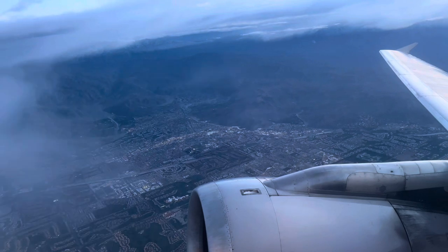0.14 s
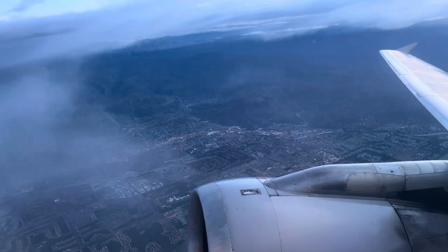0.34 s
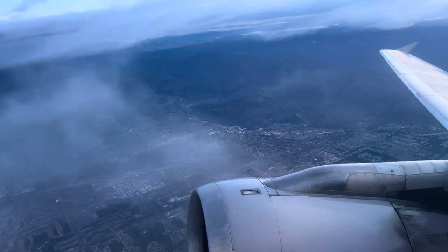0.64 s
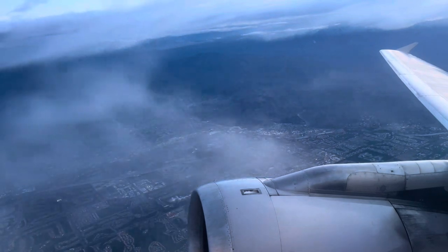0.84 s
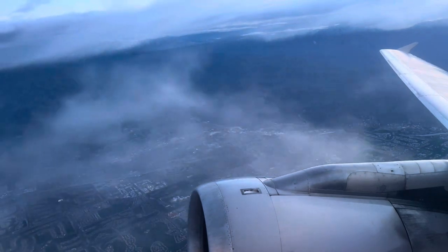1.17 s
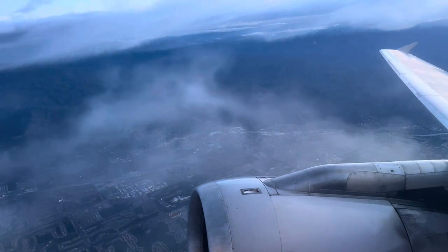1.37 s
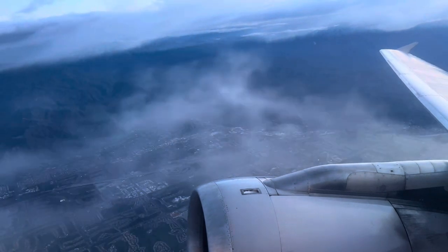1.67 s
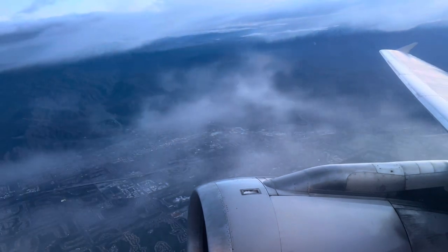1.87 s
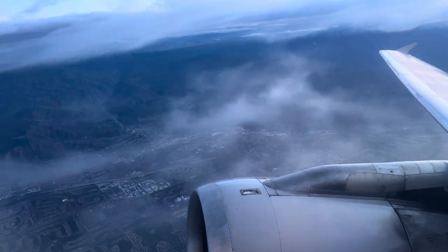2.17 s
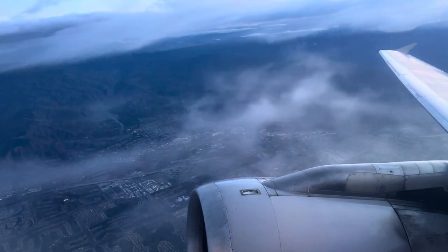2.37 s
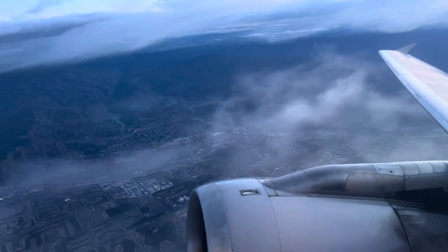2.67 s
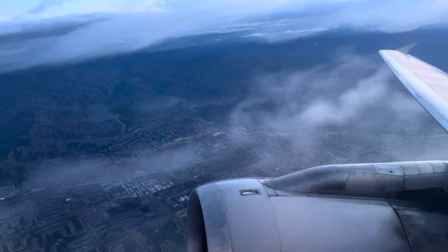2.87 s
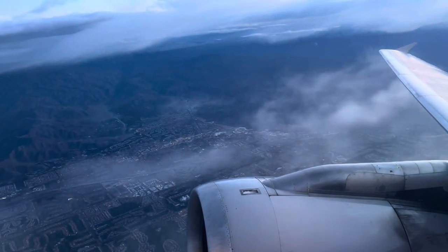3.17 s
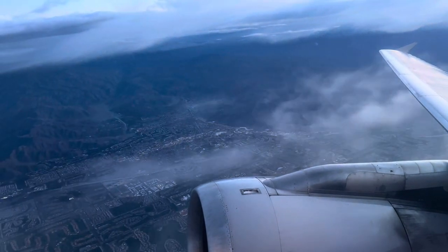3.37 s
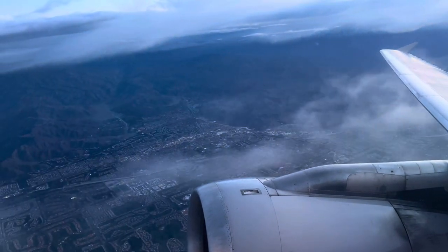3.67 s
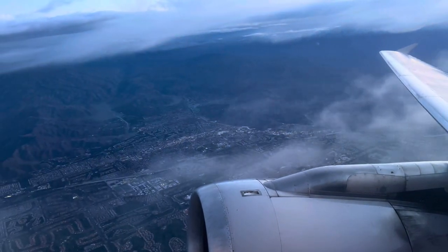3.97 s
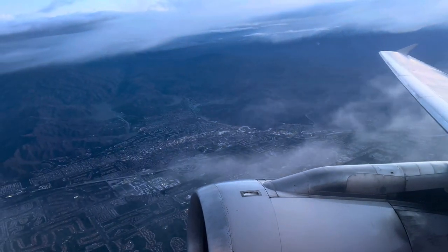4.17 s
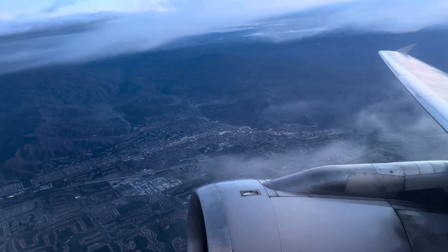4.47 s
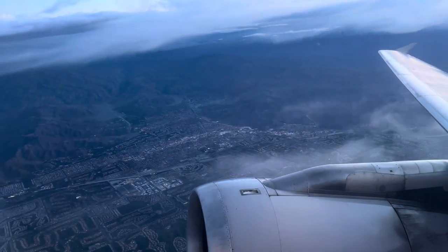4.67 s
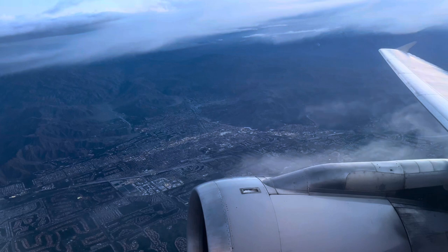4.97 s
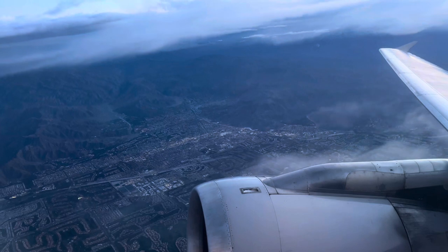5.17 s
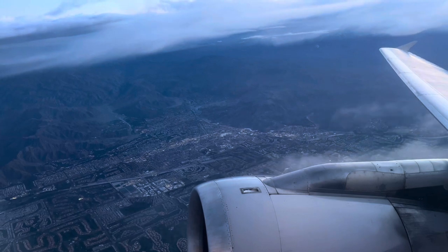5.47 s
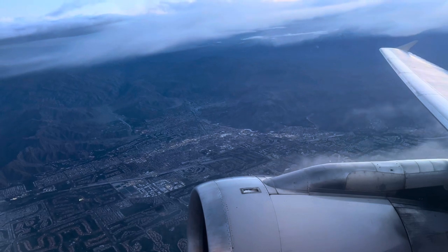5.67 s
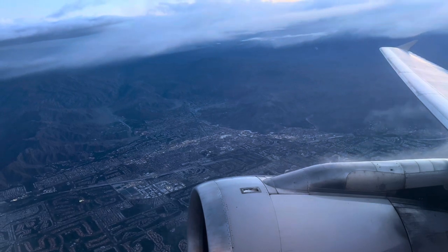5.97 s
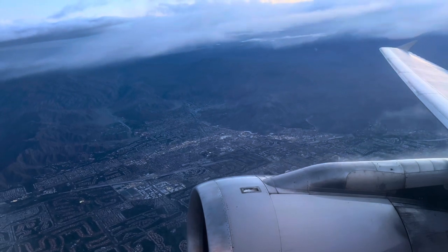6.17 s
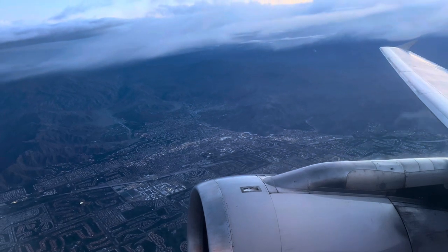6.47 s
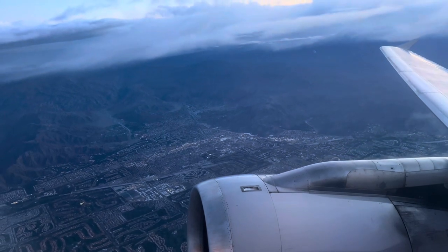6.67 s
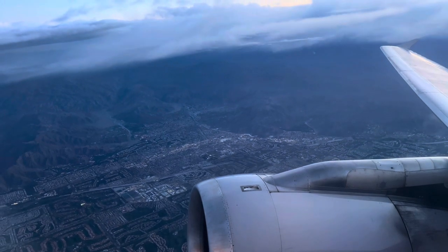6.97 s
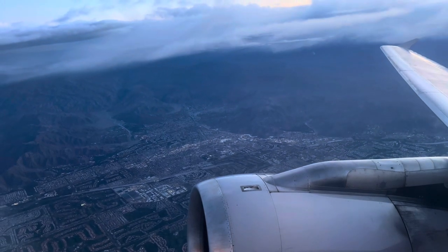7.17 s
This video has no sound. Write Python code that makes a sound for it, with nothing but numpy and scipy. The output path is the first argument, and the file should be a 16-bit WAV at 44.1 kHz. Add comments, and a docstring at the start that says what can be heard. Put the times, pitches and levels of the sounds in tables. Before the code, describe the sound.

Inside an airliner cabin at a window beside the engine, a deep low roar holds steady under an even rush of air. A buzzing engine tone and a medium-high whine waver gently within it. Close to the stereo microphones, plastic trim snaps a few times, most clearly around two and three seconds, with faint brushes of fabric and soft rustling at the end.

```python
"""Inside a climbing airliner, at a window beside the engine: exhaust and airflow roar through the cabin wall.
Both are shaped noise. The fan adds sines: a buzz-saw comb on its shaft rate, whose high lines fade most,
one shrill line, and a whine at its blade rate that swells and sinks; the two engines throb against each other.
Close by, fabric rustles and plastic trim snaps a few times, as short bursts of noise."""
import sys
import numpy as np
from scipy.fft import rfft, irfft, next_fast_len
from scipy.io import wavfile
from scipy.ndimage import map_coordinates

SR = 44100
rng = np.random.default_rng(int(sys.argv[2]) if len(sys.argv) > 2 else 0)


def wav_record(signal):
    """Record a signal, one row per channel, as 16-bit PCM in the file named by sys.argv[1]."""
    frames = np.transpose(np.atleast_2d(signal))
    bounded = np.clip(frames, -1, 1)
    # unit amplitude maps onto the largest positive 16-bit level
    quanta = np.round(bounded * 32767).astype(np.int16)
    wavfile.write(sys.argv[1], SR, quanta)


N = 323234  # samples, about 7.33 s

SHAFT_HZ, BLADES = 80.63, 22
# the thin sizzle on top of snaps and strokes: centre in Hz, relative width
SIZZLE_HZ, SIZZLE_WIDTH = 13400, 0.2


def amp(db):
    """Decibels to gain."""
    return 10 ** (np.asarray(db) / 20)


def unit(x):
    """Scale to rms 1."""
    return x / np.sqrt(np.mean(x ** 2) + 1e-20)


def along(points, hz):
    """(Hz, value) points read on a log frequency axis."""
    f, v = np.transpose(points)
    return np.interp(np.log(hz + 1), np.log(f + 1), v)


def curve(points):
    """(s, value) points read at every sample."""
    return np.interp(np.arange(N) / SR, *np.transpose(points))


def humps(peaks, hz):
    """The dB lift of a few (Hz, width, dB) resonances."""
    return sum(db / (1 + (2 * (hz - centre) / width) ** 2) for centre, width, db in peaks)


def wobble(rate):
    """A smooth random curve, rate knots a second."""
    coarse = np.linspace(0, N, 1024)
    knots = rng.standard_normal(256)
    values = map_coordinates(knots, [coarse * rate / SR], mode="mirror")
    return np.interp(np.arange(N), coarse, values)


def grain(rate, depth_db):
    """A gain of rms 1 through rate random levels a second, as a surface catches and slips."""
    knots = np.clip(rng.standard_normal(N), -2, 2)
    level = np.interp(np.arange(N) * rate / SR, np.arange(N), knots)
    return unit(amp(depth_db * level))


def filtered(x, response):
    """x times a response of frequency, padded so that its end does not wrap onto its start."""
    size = next_fast_len(N + SR // 2)
    hz = np.fft.rfftfreq(size, 1 / SR)
    return irfft(rfft(x, size) * response(hz), size)[..., :N]


def cabin_noise(colour_db):
    """Noise of rms 1 as stereo, its two sides more or less alike by frequency."""
    # likeness of the left and right noise: pitch_hz, correlation (-1 to 1)
    alike = [(40, .995), (90, .97), (160, .975), (300, .8), (430, .25), (560, -.45), (780, -.15),
             (1050, .45), (1300, .35), (1750, -.45), (2300, .1), (7000, .2), (10300, -.5), (13000, .4)]
    # lean of the noise to one side: pitch_hz, left_minus_right_db
    lean = [(150, 0), (210, 2), (260, 4), (310, 1), (390, -4), (490, 1), (650, 7.5), (850, 3.5), (1250, 0),
            (2500, -3), (5500, 2.5), (8500, -3.5), (11000, 1.5)]

    def mid_and_side(hz):
        turn = np.arccos(np.clip(along(alike, hz), -1, 1)) / 2
        return np.array([np.cos(turn), np.sin(turn)])

    def colour(hz):
        return amp(colour_db(hz) + np.outer([0.5, -0.5], along(lean, hz)))

    mid, side = filtered(rng.standard_normal((2, N)), mid_and_side)
    return unit(filtered(np.array([mid + side, mid - side]), colour))


def hiss(centre_hz, damping, size, reach):
    """A piece of stereo noise of rms 1 in one broad resonance, thinning out above reach times its centre."""
    hz = np.fft.rfftfreq(size, 1 / SR)
    band = 1j * hz / (centre_hz ** 2 - hz ** 2 + 1j * hz * centre_hz * damping)
    soft = 1 / np.sqrt(1 + (hz / (reach * centre_hz)) ** 4)
    return unit(irfft(rfft(rng.standard_normal((2, size))) * band * soft, size))


def sizzle(size):
    """Bright noise of rms 1, the same on both sides."""
    hz = np.fft.rfftfreq(size, 1 / SR)
    band = np.exp(-2 * ((hz / SIZZLE_HZ - 1) / SIZZLE_WIDTH) ** 2)
    return unit(irfft(rfft(rng.standard_normal(size)) * band, size))


def add(track, sound, s):
    """Mix a short stereo sound in from time s, cut at the ends of the track."""
    start = round(s * SR)
    sound = sound[:, max(-start, 0):]
    part = track[:, max(start, 0):][:, :sound.shape[1]]
    part += sound[:, :part.shape[1]]


def roar(level_db=-17.0):
    """Exhaust rumble through the wall: steady noise, lifted where the cabin resonates."""
    # exhaust spectrum behind the wall: pitch_hz, relative_density_db
    exhaust = [(20, -31), (32, -25), (46, -4.5), (63, 0.5), (85, -1), (105, -2.5), (120, -6.5), (165, -6.5),
               (205, -12), (300, -9.5), (355, -13), (395, -14), (440, -19), (480, -18), (520, -20),
               (560, -21), (750, -29.5), (1500, -81)]
    # cabin resonances: pitch_hz, width_hz, lift_db
    resonances = [(136.8, 23.7, 9.5), (255, 29, 8), (414, 27.7, 7.5)]
    return amp(level_db) * cabin_noise(lambda hz: along(exhaust, hz) + humps(resonances, hz))


def airflow(level_db=-36.5, swell_db=0.28):
    """The even rush of air along the skin and from the vents, humming faintly in the ducts."""
    # spectrum of the rush: pitch_hz, relative_density_db
    rush = [(200, -21), (600, 3), (850, 3), (1250, 0.5), (1520, -10.5), (1900, -9), (2400, -13),
            (3100, -19), (4000, -23.5), (5200, -25.5), (6500, -27.5), (8500, -32.5), (11500, -38),
            (15000, -35.5)]
    # narrow noise bands of the ducts: pitch_hz, width_hz, lift_db
    duct_hums = [(1787, 31, 8.5), (2294, 22, 6), (3125, 27, 13.5), (3700, 100, 4), (3690, 53, 3.5),
                 (3830, 5.2, 11.5)]
    gain = amp(level_db + swell_db * wobble(3.4))
    return gain * cabin_noise(lambda hz: along(rush, hz) + humps(duct_hums, hz))


def fan():
    """One shaft drives the buzz, the throb, the whine and the shrill line."""
    shaft = shaft_angle()
    return buzz_saw(shaft) + throb(shaft) + blade_whine(shaft) + shrill(shaft)


def shaft_angle(drift_hz=0.012):
    """The turning of the fan in radians, almost perfectly even."""
    return 2 * np.pi * np.cumsum(SHAFT_HZ + drift_hz * wobble(1.49)) / SR


def buzz_saw(shaft, level_db=-0.5, scatter_radians=0.13):
    """Each blade's shock differs a little, so multiples of the shaft rate sound as a comb of sines."""
    # fan shaft orders: multiple, left_relative_db, right_relative_db, left_lead_radians
    orders = [(1, -25, -31, -0.5), (2, -31, -33, 0), (5, -40, -42, 0.6), (6, -41.5, -45, 1.0),
              (7, -46, -52, 2.8), (8, -48, -60, -1.1), (10, -55, -64, -2.8), (11, -48, -58, -2.2),
              (12, -58, -53, -0.1), (13, -45.5, -45.5, -0.7), (14, -49.5, -50.5, 0.2),
              (15, -55, -45.5, -0.2), (16, -58, -52, 2.4), (17, -56, -57, 0.5), (18, -63, -62, -1.5),
              (19, -62, -72, 2.2), (20, -63, -63, -3.0), (21, -55, -55, 2.8), (23, -64, -65, 2.6),
              (24, -60, -54, -3.0), (25, -63, -65, -0.1), (26, -65, -64, 2.8), (27, -59, -63, 2.5),
              (28, -66, -70, -0.1), (29, -59, -58, 0.7), (30, -56, -65, 3.1), (31, -71, -73, -2.0),
              (32, -61, -65, -2.2), (33, -66, -69, -0.3), (34, -69, -65, -0.1), (35, -60, -61, 2.2),
              (36, -63, -63, 1.2), (37, -70, -70, 0.5), (38, -63, -65, 1.6), (40, -75, -76, 0.9),
              (41, -69, -69, 0.5), (42, -69, -69, 0.5), (43, -73, -71, 1.5), (44, -68, -67, 3.0),
              (45, -67, -70, -1.1), (46, -68, -67, -0.7), (47, -74, -77, -1.7), (49, -74, -76, -1.6)]
    # swell and sinking of the upper orders: time_s, change_db
    rasp = [(0, 1), (1.4, -3.5), (2.5, 3), (3.8, -3), (4.6, 3), (5.5, 2), (6.3, 2), (7.33, 1.5)]
    rasp_order, rasp_width = 34, 5  # in shaft multiples
    fade_depth_db, fade_rate = 1.1, 1.2  # slow fading: depth at the blade rate, knots a second
    flutter_db = 1.4  # quick flutter, as deep on every order
    out, rasp_db = np.zeros((2, N)), curve(rasp)
    for multiple, left_db, right_db, lead in orders:
        # turbulent air on the way makes short waves fade and waver; long ones hold steadier
        shortness = multiple / BLADES
        fade_db = fade_depth_db * shortness * wobble(fade_rate)
        swell_db = rasp_db * np.exp(-((multiple - rasp_order) / rasp_width) ** 2)
        gain = unit(amp(fade_db + flutter_db * wobble(7.4))) * amp(swell_db)
        phase = multiple * shaft + scatter_radians * (1 + shortness) * wobble(12)
        left = amp(left_db) * np.sin(phase + lead)
        right = amp(right_db) * np.sin(phase)
        out += gain * np.array([left, right])
    return np.sqrt(2) * amp(level_db) * out  # the root of two makes sine levels rms


def throb(shaft, near_db=-34.0, far_db=-39.0):
    """The third orders of the two engines beat, for the far engine runs slightly faster."""
    order, beat_hz, beat_null_s = 3, 1.8, 3.39
    slip = 2 * np.pi * beat_hz * (np.arange(N) / SR - beat_null_s)
    phase = order * shaft
    near = amp(near_db) * np.sin(phase)
    far = amp(far_db) * np.sin(phase + slip)
    return np.sqrt(2) * (near - far)


def blade_whine(shaft, level_db=-0.5, lag_radians=0.8):
    """The blade-rate tone: a standing wave and a swelling part, with an octave and a lower line, order twenty."""
    # swelling part, alike at both microphones: time_s, relative_level_db
    swelling = [(0, -41.5), (1.34, -42.5), (1.55, -50.5), (1.9, -57), (2.3, -50.5), (2.55, -44),
                (3.25, -41), (3.45, -46.5), (3.9, -51.5), (4.05, -58), (4.28, -53), (4.42, -40.5),
                (4.7, -42), (5.0, -46), (5.35, -46.5), (5.6, -42.5), (6.1, -40), (6.65, -44.5), (7.33, -43)]
    # octave of the whine: time_s, level_db
    octave_level = [(0, -66), (.7, -68), (1.9, -78), (2.7, -62.5), (3.3, -70), (4.2, -78.5), (4.42, -61),
                    (4.68, -57), (4.85, -76), (7.33, -76)]
    # standing wave, opposite at the two microphones: time_s, level_db (before the pan)
    standing_level = [(0, -35), (1.3, -36), (2, -39), (3.3, -35), (3.7, -38.5), (4.5, -35.5), (5.8, -34.5),
                      (6.5, -34), (7.33, -34.7)]
    # twentieth order, two below the whine, which comes and goes slowly: time_s, level_db
    undertone_level = [(0, -53), (.5, -54.5), (1.15, -75), (1.7, -63), (2.4, -65), (3.2, -61), (3.9, -55),
                       (4.35, -65), (4.7, -59.5), (5.3, -73.5), (6.1, -55.5), (6.5, -54), (7.33, -57)]
    undertone_order, standing_pan_db = 20, -3  # the pan is left minus right
    phase = BLADES * shaft
    shared = amp(level_db + curve(swelling)) * np.sin(phase - lag_radians)
    octave = amp(curve(octave_level)) * np.sin(2 * phase)
    undertone = amp(curve(undertone_level)) * np.sin(undertone_order * shaft)
    sides = [amp(standing_pan_db / 2), -amp(-standing_pan_db / 2)]
    standing = np.outer(sides, amp(curve(standing_level)) * np.sin(phase))
    return np.sqrt(2) * (standing + shared + octave + undertone)


def shrill(shaft, lead_radians=1.0):
    """One high order stands out of the buzz and later sinks, out of step at the two microphones."""
    # level of the shrill order: time_s, level_db
    shrill_level = [(0, -59), (.35, -56.5), (.6, -58.5), (1.8, -58), (2.35, -59), (2.7, -71), (3.45, -57.5),
                    (4.6, -71), (5.5, -65), (6.05, -77), (6.7, -71), (7.33, -69)]
    phase = 39 * shaft  # the thirty-ninth order
    pair = np.array([np.sin(phase + lead_radians), np.sin(phase)])
    return np.sqrt(2) * amp(curve(shrill_level)) * pair


def fabric(sizzle_db=-3):
    """Soft strokes of cloth: swells of noise, uneven and scratchy as the fibres catch."""
    # strokes: height_s, level_db, half_length_s (to 1/e), centre_hz, damping (relative width)
    strokes = [(0.361, -48.5, 0.022, 5600, 0.44), (1.072, -52, 0.038, 5960, 0.63),
               (1.49, -54.5, 0.028, 13740, 0.26), (2.154, -46, 0.026, 5340, 0.93),
               (3.251, -37, 0.022, 1480, 0.88), (3.252, -42, 0.022, 4220, 1.3),
               (3.289, -52.5, 0.036, 4140, 0.75), (6.835, -52.5, .018, 8430, 1.2),
               (6.892, -48, 0.029, 5800, 0.9), (6.951, -53, 0.034, 4680, .9),
               (7.032, -48, 0.045, 5600, 1.1), (7.058, -53, 0.24, 7700, 1.6),
               (7.269, -53, 0.12, 4800, 0.96)]
    out, t = np.zeros((2, N)), np.arange(SR) / SR
    middle = t.mean()
    for s, db, half, centre_hz, damping in strokes:
        shine = amp(sizzle_db) * (centre_hz / SIZZLE_HZ) ** 2  # brighter strokes sizzle more
        rub = hiss(centre_hz, damping, size=len(t), reach=0.78) + shine * sizzle(len(t))
        swell = np.exp(-((t - middle) / half) ** 2)
        add(out, amp(db) * swell * rub, s - middle)
    return out * grain(rate=150, depth_db=1.8) * grain(rate=900, depth_db=2.8)


def trim(crackle_db=1.5, attack_s=0.00025, crack=0.25, crack_life_s=0.0042, panel_hz=1400, panel_damping=0.8):
    """Plastic slips with a crack, knocks its panel and scatters briefly among the seats."""
    # snaps: start_s, level_db, centre_hz, damping (relative width), t60_s, left_minus_right_db,
    # panel_knock_db, sizzle_db (levels before the envelope)
    snaps = [(0.729, -43.5, 3660, 0.38, 0.15, -3, -65, -81), (1.055, -50, 7500, 0.46, .15, -2.5, -58, -69),
             (1.6718, -32, 3800, 0.55, 0.12, -5.5, -30, -49.5),
             (1.673, -37, 8500, 0.2, 0.081, -1.5, -51, -47.5),
             (1.680, -37.5, 3300, .8, .11, 0, -38.5, -49.5), (1.746, -40, 6200, 0.5, 0.098, 6.5, -43, -62),
             (1.753, -40, 6040, 0.25, 0.084, -0.5, -50, -60.5),
             (2.6313, -34.5, 7420, 0.37, 0.15, -0.5, -62, -43),
             (2.634, -29.5, 7900, 0.3, 0.025, 4.5, -58, -37),
             (2.643, -39, 5870, 0.18, .08, 2.5, -62, -62.5),
             (2.6755, -33, 5200, 0.2, 0.085, 0.5, -40, -68.5), (3.218, -34.5, 2250, .3, 0.055, 1, -45, -87),
             (3.242, -46, 4500, 0.62, 0.28, 0.5, -37.5, -72),
             (5.076, -47.5, 5430, 0.45, 0.11, 2.5, -50, -69), (6.892, -49.5, 4740, .4, .06, 5, -49, -65),
             (7.19, -44.5, 5240, 0.7, 0.09, 6, -49.5, -61.5)]
    out, t = np.zeros((2, N)), np.arange(SR // 4) / SR
    for s, db, centre_hz, damping, t60, pan_db, knock_db, sizzle_db in snaps:
        decay = np.exp(-np.log(1000) * t / t60) + crack * np.exp(-t / crack_life_s)
        envelope = (1 - np.exp(-t / attack_s)) * decay
        snap = amp(db) * hiss(centre_hz, damping, size=len(t), reach=1.15)
        snap += amp(sizzle_db) * sizzle(len(t))
        snap += amp(knock_db) * hiss(panel_hz, panel_damping, size=len(t), reach=7.8)
        sides = amp(np.array([[0.5], [-0.5]]) * pan_db)
        add(out, sides * envelope * snap, s)
    return out * grain(rate=790, depth_db=crackle_db)


def scene():
    """The steady drone with the small sounds near the seat."""
    return roar() + airflow() + fan() + fabric() + trim()


def record(dry):
    """Shapes the top octave, separately for sum and difference, and cuts all above top_hz."""
    # gain of the sum of the sides: pitch_hz, gain_db
    sum_gain = [(9100, 0), (9900, -8), (11200, -7), (12500, -3.5), (14000, -5), (15500, -7)]
    # gain of the difference of the sides: pitch_hz, gain_db
    difference_gain = [(9000, 0), (10000, 1), (11300, 2.5), (12200, -7), (15500, -10)]
    top_hz = 15700

    def colour(hz):
        return amp([along(sum_gain, hz), along(difference_gain, hz)]) * (hz < top_hz)

    left, right = dry
    mid, side = filtered(np.array([left + right, left - right]) / 2, colour)
    return np.array([mid + side, mid - side])


dry = scene()
out = record(dry)
wav_record(out)
```